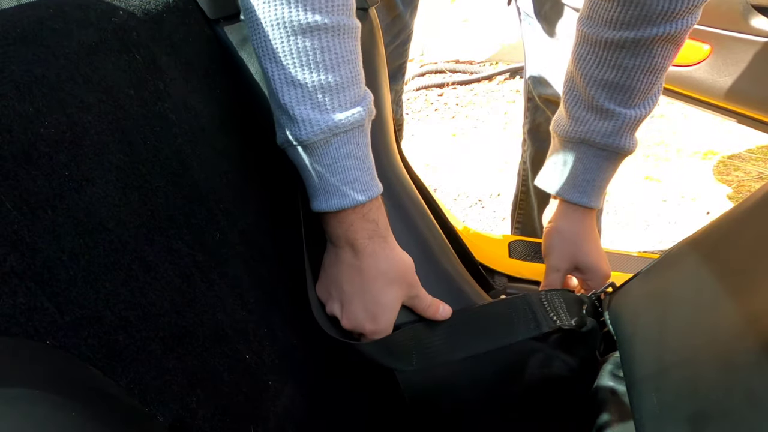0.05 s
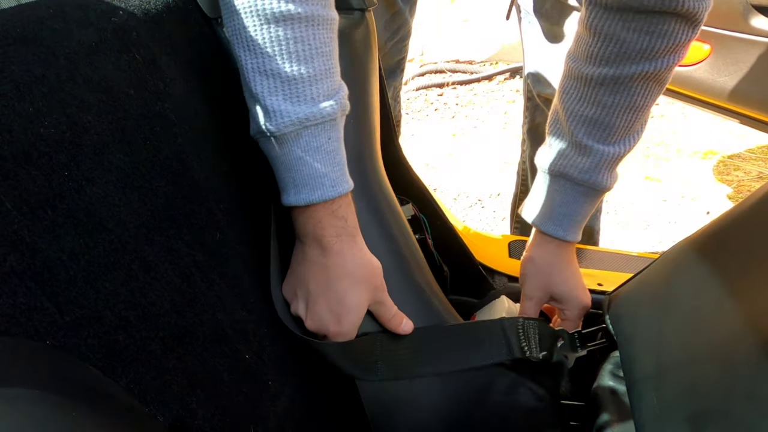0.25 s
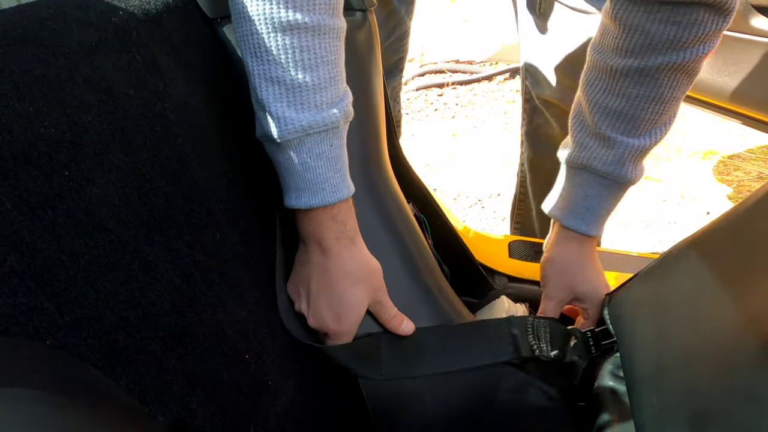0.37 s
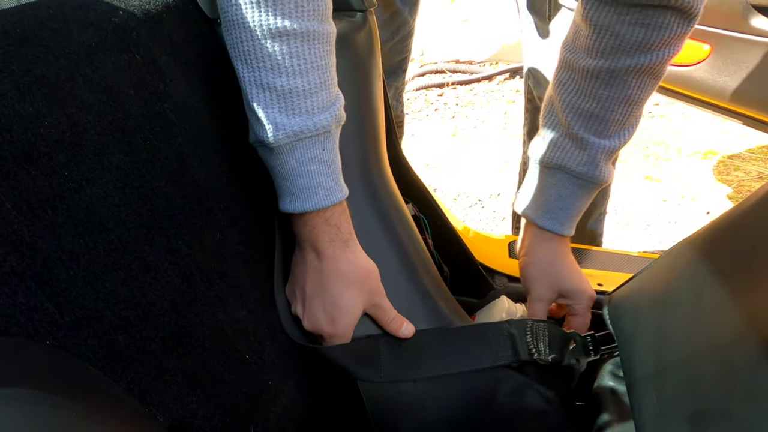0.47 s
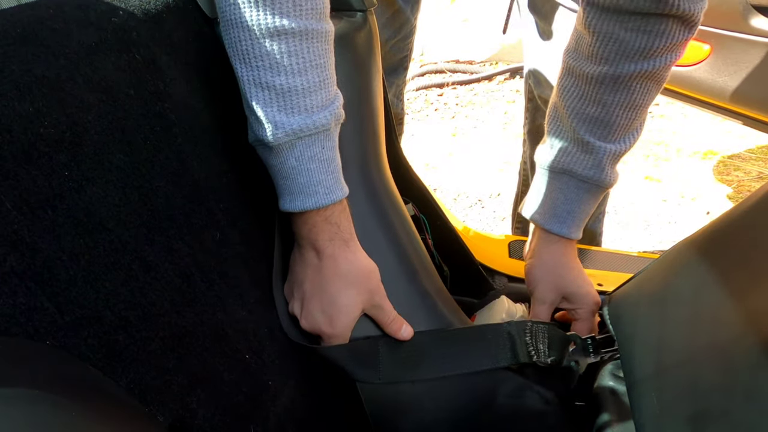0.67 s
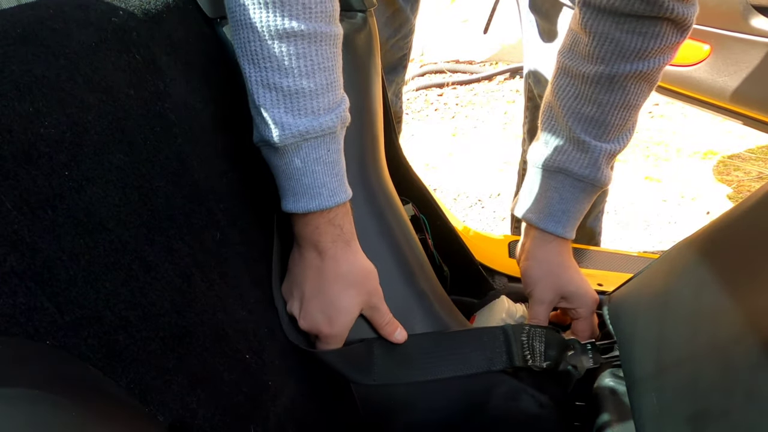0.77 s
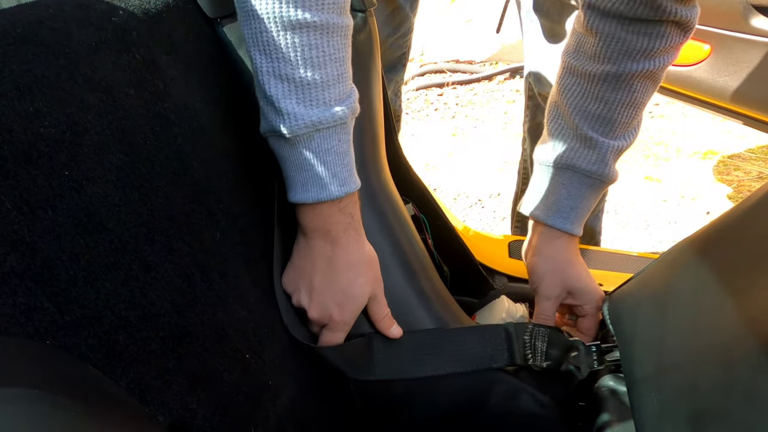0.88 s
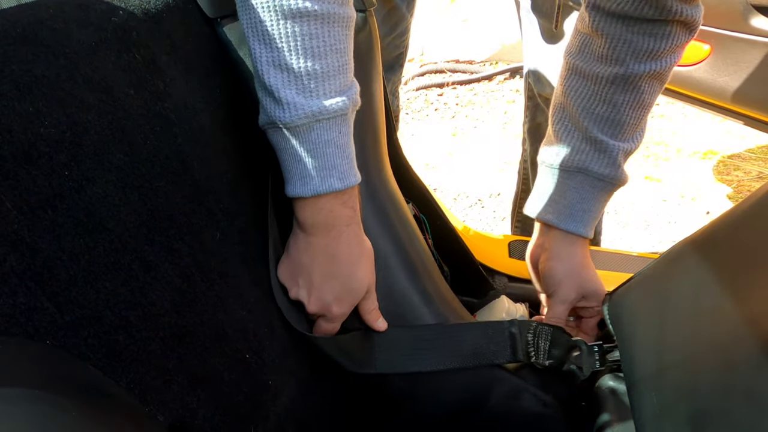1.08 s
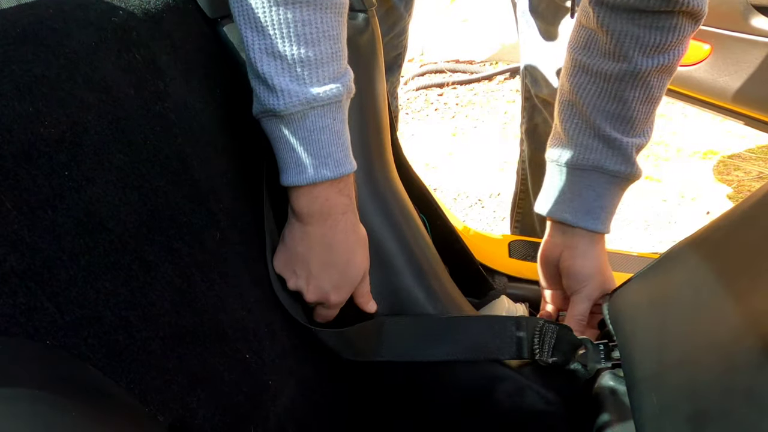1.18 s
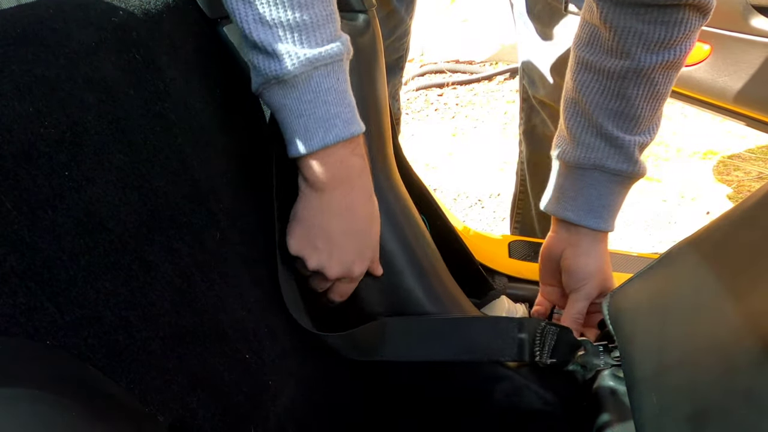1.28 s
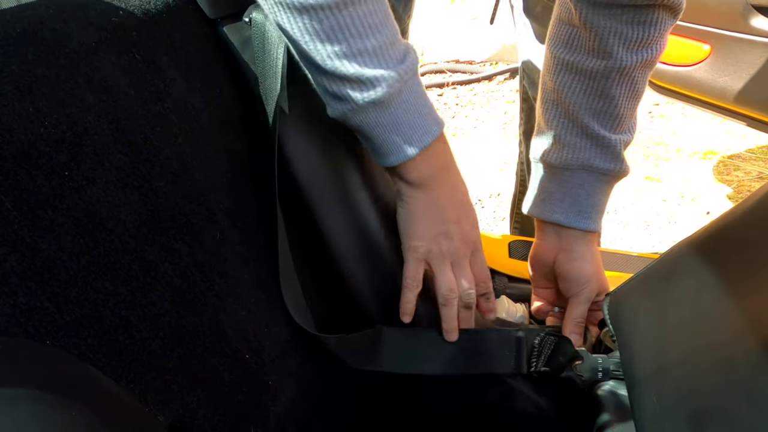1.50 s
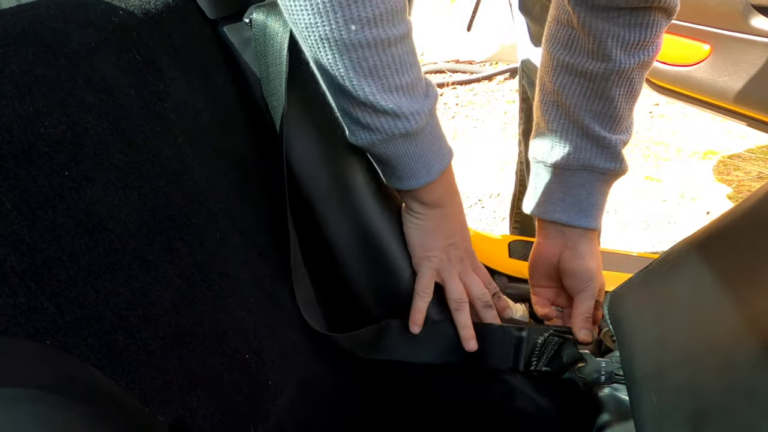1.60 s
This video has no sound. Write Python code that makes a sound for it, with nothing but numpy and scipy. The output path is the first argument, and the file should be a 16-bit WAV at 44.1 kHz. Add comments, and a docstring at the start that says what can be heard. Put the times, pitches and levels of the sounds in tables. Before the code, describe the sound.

Close by in a quiet car cabin, seat belt webbing slips in quick jerks and rushes against the seat. Light metal clicks and cloth rustle follow, then one hard snap of the fitting and a few small ticks.

```python
"""Fastening a seat belt

Two hands work a seat belt into its fitting inside a parked car. The taut webbing slips in jerks
(stick-slip friction), rushes through and thuds against the seat. Impacts excite the modes of the
metal fitting, which clicks and snaps once, hard. Sleeves and strap rustle in between, and the
enclosed air of the cabin booms softly under the shoves."""
import sys
import numpy as np
from scipy import signal
from scipy.fft import rfft, irfft, next_fast_len
from scipy.io import wavfile

SR = 44100
rng = np.random.default_rng(int(sys.argv[2]) if len(sys.argv) > 2 else 0)


def unload_wav(signal):
    """Save mono or channel-first audio to the path in sys.argv[1] as 16-bit WAV at rate SR, clipped to [-1, 1]."""
    wavfile.write(
        sys.argv[1],
        SR,
        np.round(np.clip(np.atleast_2d(signal).T, -1, 1) * 32767).astype(np.int16),
    )


N = 72765
T = np.arange(N) / SR
RING_SAMPLES = 8192
BAND_HZ = 25 * 2 ** (np.arange(38) / 4)  # quarter-octave centres
CONTACT_RISE_S = 0.00045

# spectrum of rubbing cloth: (frequency [Hz], relative density [dB])
CLOTH_SPECTRUM = [(200, 0), (450, 4), (740, -6.5), (1250, -2), (1560, 0), (1900, -9.5), (2500, -9),
                  (3600, -12), (4800, -16), (9000, -29.5), (15000, -51.5)]
# stereo difference against the sum: (frequency [Hz], gain [dB])
STEREO_WIDTH = [(60, -20), (250, -27), (700, -13), (1500, -13), (3000, -9), (6000, -3), (12000, -1)]


def strap_slips():
    """Stick-slip friction: each jerk of the taut webbing cracks, knocks the trim and pings the guide loop."""
    # jerks: (time [s], level [dB], relative ping level [dB])
    slips = [(0.2052, -23, 3), (0.221, -22, 1.5), (0.2465, -23.5, 2.5), (0.2678, -22.5, 5),
             (0.289, -21.5, 3), (0.2984, -22.5, 5), (0.3149, -28.5, 3), (0.3269, -28, 3),
             (0.3346, -23.5, -17)]
    # ring of the trim: (frequency [Hz], relative density [dB])
    spectrum = [(70, -43), (130, 1.5), (220, 7), (550, -3.5), (770, -7), (900, -3), (2100, -10),
                (3200, -25.5), (4700, -26), (15000, -90)]
    out = np.zeros((2, N))
    for s, db, ping_db in slips:
        add(out, s, amp(db) * (crack() + amp(-6) * knock(at_hz(spectrum, BAND_HZ), t60=0.07)))
        ping_hz = 4000 * rng.normal(1, 0.017)
        out += amp(db + ping_db) * mode(s, ping_hz, t60=0.02)
    return out


def strap_rush():
    """Sliding friction: dense fibre catches merge into noise as the strap rushes through."""
    # envelope: (time [s], level [dB])
    envelope = [(.21, -45), (.285, -29.5), (.305, -32), (.325, -20.5), (.352, -12.5), (.385, -20),
                (.41, -25.5), (.45, -35.5), (.6, -39.5)]
    # sliding webbing: (frequency [Hz], relative density [dB])
    spectrum = [(40, 2.5), (100, -9), (156, 6), (320, -2), (540, -9.5), (760, -17), (980, -6.5),
                (1920, -16), (3300, -25.5), (4500, -26.5), (5400, -37), (9000, -40.5), (15000, -64)]
    return level(envelope) * coloured(grains(per_s=2800, spread_db=2), spectrum)


def latch_snap():
    """Free vibration: the latch springs home once and rings, amplitude-modulated by its chatter."""
    # modes of the latch: (frequency [Hz], level [dB])
    modes = [(930, 3), (1233, -5), (1965, -8), (2280, 2.5), (2550, -2), (2790, -9), (3284, -6.5),
             (3560, -11.5), (3870, -5), (5240, -10.5)]
    out = np.zeros(N)
    add(out, s=1.3335, sound=amp(-16) * metal_ring(modes, t60=0.054, rise=0.001))
    lowpass = signal.butter(2, 300, fs=SR, output="sos")
    chatter = unit_power(signal.sosfilt(lowpass, rng.standard_normal(N)))
    return out * (1 + 0.55 * chatter)


def fitting_clicks():
    """Impact excitation: each touch of the fitting clacks and rings the modes of the metal tongue."""
    # touches: (time [s], level [dB], extra bass [dB], extra treble [dB], extra top [dB], ring [dB])
    touches = [(.0305, -38, 4.5, 8.5, 7.5, -5.5), (0.0708, -40, 1, -7, 5.5, -10),
               (0.302, -24, -13, 5.5, 2, -9), (0.3439, -28, 13, 12, -8, -22),
               (0.356, -21, -7, 11.5, 1.5, -7), (0.3756, -30, 7.5, 17, 15, -16),
               (0.4916, -29.5, -5.5, 2.5, 5, -14), (.494, -31, 0, 1, 18.5, -7),
               (.5558, -26.5, -5.5, 8, 1.5, 3), (0.6771, -30, -4, 1.5, 2, 2),
               (0.7185, -37.5, -16, -3, 0, -6), (0.739, -36.5, -5, 5, 3.5, -6),
               (.771, -41.5, -22, -0.5, 4.5, -24), (1.0264, -29.5, 2.5, -18, -16, -6),
               (1.333, -21.5, -14, 7.5, 10, -25), (1.3901, -30.5, 1, 5.5, 5.5, -6)]
    # clack: (frequency [Hz], relative density [dB])
    spectrum = [(70, 11), (130, -5), (230, 10), (400, 2.5), (740, -7), (960, -1), (1700, -1.5),
                (2400, -6.5), (3600, -14), (5000, -20.5), (8500, -35), (15000, -64.5)]
    # modes of the tongue: (frequency [Hz], level [dB])
    tongue = [(1650, -6), (2331, 2.5), (2896, -8), (3430, -4.5), (3590, -5.5), (4420, -10), (6450, -27)]
    out = np.zeros((2, N))
    for s, db, bass, treble, top, ring_db in touches:
        tint = at_hz([(300, bass), (750, 0), (2300, 0), (4000, treble), (7000, top)], BAND_HZ)
        clack = amp(-10.5) * knock(at_hz(spectrum, BAND_HZ) + tint, t60=0.036)
        ring = amp(ring_db) * metal_ring(tongue, t60=0.047, spread_db=-0.5)
        add(out, s, amp(db) * (clack + ring))
    return out


def seat_thuds():
    """Damped oscillation: each blow excites one low mode of the seat or its trim."""
    # blows: (time [s], level [dB], frequency [Hz], 60 dB decay time [s])
    blows = [(.034, -26.5, 218.6, 0.38), (.105, -26, 269, .1), (0.338, -10, 458, 0.068),
             (0.344, -7.5, 159, 0.073), (.351, -22, 250.7, 0.22), (0.371, -8, 150, 0.091),
             (0.571, -26, 210.4, 0.19), (.68, -27, 201.5, 0.14), (1.027, -16, 364, 0.042),
             (1.039, -24.5, 121.4, 0.15), (1.3354, -5, 247, 0.077), (1.353, -12, 205, 0.087)]
    return sum(amp(db) * mode(s, hz, t60, rise=0.0016) for s, db, hz, t60 in blows)


def webbing_catches():
    """Stick-slip under the hand: each catch gives a small crack, a scuff of cloth and a dull tick."""
    # catches: (time [s], level [dB], tick frequency [Hz])
    catches = [(0.0455, -42, 1556), (0.1114, -33.5, 980), (.114, -34, 1295), (1.321, -33.5, 1460),
               (1.457, -40, 1450), (1.4845, -33.5, 1290), (1.5064, -33.5, 1425), (1.5236, -35.5, 1300),
               (1.553, -33.5, 1455), (1.5645, -37, 1375), (1.5885, -36, 1344), (1.5996, -37.5, 1540),
               (1.6124, -37, 1390)]
    out = np.zeros((2, N))
    for s, db, hz in catches:
        release = amp(-3) * crack()
        scuff = amp(-14) * knock(at_hz(CLOTH_SPECTRUM, BAND_HZ), t60=0.04)
        add(out, s, amp(db) * (release + scuff))
        out += amp(db + 8) * mode(s, hz, t60=0.032)
    return out


def webbing_zips():
    """Periodic excitation: ribs passing an edge rasp in noise bands that rise as the strap gathers speed."""
    # passes: (time [s], duration [s], level [dB], start pitch [Hz], end pitch [Hz], bandwidth [Hz])
    passes = [(0.588, .09, -39.5, 1433, 1680, 260), (0.786, 0.115, -54.5, 1610, 1708, 323)]
    # bands of the rasp: (ratio to the pitch [1], level [dB])
    bands = [(0.999, -0.5), (1.331, -8), (2.24, -10.5)]
    out = np.zeros(N)
    for s, duration, db, start_hz, end_hz, width_hz in passes:
        lowpass = signal.butter(2, width_hz / 2, fs=SR, output="sos")
        progress = np.clip((T - s) / duration, 0, 1)
        phase = 2 * np.pi * np.cumsum(start_hz + (end_hz - start_hz) * progress) / SR
        for ratio, band_db in bands:
            in_phase, quadrature = unit_power(signal.sosfilt(lowpass, rng.standard_normal((2, N))))
            rasp = in_phase * np.cos(ratio * phase) + quadrature * np.sin(ratio * phase)
            out += amp(db + band_db) * np.sin(np.pi * progress) * rasp
    return out


def sleeve_rustle():
    """Friction noise: cloth rubs over strap and seat in many tiny catches."""
    # envelope: (time [s], level [dB])
    envelope = [(0, -41), (.12, -40), (.145, -43), (.2, -46), (.54, -42), (.6, -51), (.67, -41), (.75, -57),
                (.925, -57.5), (.975, -39.5), (1.05, -35.5), (1.1, -40), (1.135, -48), (1.2, -47),
                (1.26, -36.5), (1.32, -38.5), (1.38, -33), (1.42, -35.5), (1.475, -29.5), (1.51, -40),
                (1.54, -50), (1.6, -46.5), (1.65, -46)]
    return level(envelope) * coloured(grains(per_s=2700, spread_db=-1), CLOTH_SPECTRUM)


def hand_bumps():
    """Soft impacts: hands bumping on the seat excite mainly low frequencies."""
    # envelope: (time [s], level [dB])
    envelope = [(0, -47), (.06, -35), (.18, -40.5), (.44, -30.5), (.55, -36), (.64, -49.5), (.79, -40),
                (.86, -53.5), (.965, -34), (1.01, -44), (1.055, -33), (1.12, -37.5), (1.2, -43.5),
                (1.29, -40), (1.4, -30), (1.47, -35), (1.61, -31.5), (1.65, -56)]
    # dull bumping: (frequency [Hz], relative density [dB])
    spectrum = [(60, -18), (105, -11), (150, -3), (215, 0), (290, -6), (350, -5), (450, -13), (560, -26),
                (750, -48), (2000, -80)]
    return level(envelope) * coloured(grains(per_s=500, spread_db=2), spectrum)


def cabin_boom(boom_hz=49.6):
    """Cavity resonance: a low mode of the enclosed air swells and dies under each shove."""
    # shoves: (time [s], peak level [dB], swell time [s])
    shoves = [(.335, -25.5, 0.075), (0.768, -37, 0.026), (1.05, -29, 0.027), (1.4, -29.5, 0.029),
              (1.59, -33, 0.028)]
    out = np.zeros(N)
    for s, db, swell in shoves:
        t = np.maximum(T - s, 0)
        envelope = (t / swell * np.exp(1 - t / swell)) ** 2
        out += amp(db) * envelope * np.sin(2 * np.pi * boom_hz * t)
    return out


def cabin_resonance(direct, width_hz=22):
    """Normal modes: the small closed space and its trim ring on after the direct sound."""
    # resonances: (frequency [Hz], level against the direct sound [dB])
    modes = [(239, -6), (458, -2), (538, -3), (623, -4), (861, -5), (960, -3.5), (1480, 0), (1567, -3)]
    return direct + sum(amp(db) * signal.lfilter(*signal.iirpeak(hz, hz / width_hz, fs=SR), direct)
                        for hz, db in modes)


def cabin_air():
    """Ambient noise: a faint, steady rumble fills the cabin."""
    # still air: (frequency [Hz], relative density [dB])
    spectrum = [(22, -7), (48, 0), (75, -11), (200, -14), (350, -26), (700, -46), (1600, -37), (4000, -47),
                (8000, -57), (15000, -75)]
    return amp(-46) * coloured(rng.standard_normal((2, N)), spectrum)


def crack():
    """Broadband transient: the first few milliseconds of a sudden release."""
    # crack: (frequency [Hz], relative density [dB])
    spectrum = [(400, -12.5), (1700, -20), (5500, -39), (10000, -56.5), (15000, -85)]
    return knock(at_hz(spectrum, BAND_HZ), t60=0.014)


def knock(band_db, t60):
    """Dense modes ring as noise bands: lows rise later and last longer; t60 [s] holds at 1 kHz."""
    t, hz = np.arange(RING_SAMPLES) / SR, BAND_HZ[:, None]
    bin_hz = np.maximum(np.arange(RING_SAMPLES // 2 + 1) * SR / RING_SAMPLES, 1)
    in_band = np.abs(np.log2(bin_hz / hz)) < 1 / 8
    noise = irfft(rfft(rng.standard_normal((2, 1, RING_SAMPLES))) * in_band)
    band_t60 = t60 * (1000 / hz) ** 0.083
    cabin_tail = amp(-25 - 60 * t / 0.17)
    attack = 1 - np.exp(-t / (CONTACT_RISE_S + 1 / hz))
    rings = noise * (amp(-60 * t / band_t60) + cabin_tail) * attack
    energy = np.sum(rings ** 2, axis=-1, keepdims=True) + 1e-20
    rings *= amp(band_db)[:, None] * np.sqrt(hz / energy)  # wider bands carry more energy
    return left_right(rings[0].sum(0), amp(at_hz(STEREO_WIDTH, BAND_HZ)) @ rings[1])


def metal_ring(modes, t60, rise=CONTACT_RISE_S, spread_db=0):
    """Modal superposition: struck metal rings as damped sines, their levels scattered by spread_db."""
    t = np.arange(RING_SAMPLES) / SR
    hz, db = np.transpose(modes)
    strengths = rng.choice([-1, 1], len(hz)) * amp(db + spread_db * rng.standard_normal(len(hz)))
    return strengths @ np.sin(2 * np.pi * hz[:, None] * t) * amp(-60 * t / t60) * (1 - np.exp(-t / rise))


def mode(s, hz, t60, rise=CONTACT_RISE_S):
    """Damped oscillator: a sine that starts at time s and falls 60 dB in t60 seconds."""
    t = np.maximum(T - s, 0)
    return np.sin(2 * np.pi * hz * t) * amp(-60 * t / t60) * (1 - np.exp(-t / rise))


def grains(per_s, spread_db):
    """Shot noise: random impulses of uneven size, in two uncorrelated rows."""
    occurs = rng.random(N) < per_s / SR
    sizes = amp(spread_db * np.minimum(rng.exponential(1, N), 3.5))
    return occurs * sizes * rng.choice([-1, 1], (2, N))


def coloured(pair, spectrum):
    """Spectral shaping: two uncorrelated signals become one stereo sound of unit power."""
    size = next_fast_len(N + RING_SAMPLES)
    hz = np.arange(size // 2 + 1) * SR / size
    mid, side = rfft(pair, size) * amp(at_hz(spectrum, hz))
    stereo = left_right(mid, side * amp(at_hz(STEREO_WIDTH, hz)))
    return unit_power(irfft(stereo, size)[:, :N])


def level(envelope):
    """Gain interpolated in decibels, silent from 40 ms beyond either end of the envelope."""
    s, db = np.transpose(envelope)
    return amp(np.interp(T, s, db)) * (T >= s[0] - 0.04) * (T <= s[-1] + 0.04)


def at_hz(spectrum, hz):
    """Interpolation of a spectrum on a log-frequency axis."""
    point_hz, db = np.transpose(spectrum)
    return np.interp(np.log(np.maximum(hz, 1)), np.log(point_hz), db)


def amp(db):
    """Decibels to amplitude ratio."""
    return 10 ** (np.asarray(db) / 20)


def unit_power(x):
    """Normalisation to a mean square of one."""
    return x / np.sqrt(np.mean(x ** 2) + 1e-20)


def add(out, s, sound):
    """Superposition of a sound from time s on."""
    i = int(np.clip(s * SR, 0, N - 1))
    out[..., i:i + sound.shape[-1]] += sound[..., :N - i]


def left_right(mid, side):
    """Sum-and-difference stereo."""
    return np.array([mid + side, mid - side])


def scene():
    """Superposition of all sources, which arrive a little later and weaker on the left."""
    air = cabin_air()
    contacts = strap_slips() + fitting_clicks() + webbing_catches()
    rustle = strap_rush() + sleeve_rustle() + hand_bumps()
    resonant = amp(-2.5) * cabin_resonance(contacts + rustle)
    left, right = resonant + latch_snap() + seat_thuds() + cabin_boom() + webbing_zips() + air
    lag = round(45e-6 * SR)
    return np.array([amp(-1) * np.pad(left, (lag, 0))[:N], right])


def record(dry):
    """Band limiting and soft saturation: the deepest bass and the top are cut, high peaks rounded."""
    highpass = signal.butter(2, 22, "high", fs=SR, output="sos")
    lowpass = signal.cheby2(12, 70, 16500, fs=SR, output="sos")
    x = signal.sosfilt(highpass, dry)
    rounded = x / (1 + (x / 0.8) ** 4) ** 0.25
    fade = np.minimum(np.minimum(T, T[-1] - T) / 0.004, 1)
    return signal.sosfilt(lowpass, rounded * fade)


dry = scene()
out = record(dry)
unload_wav(out)
```